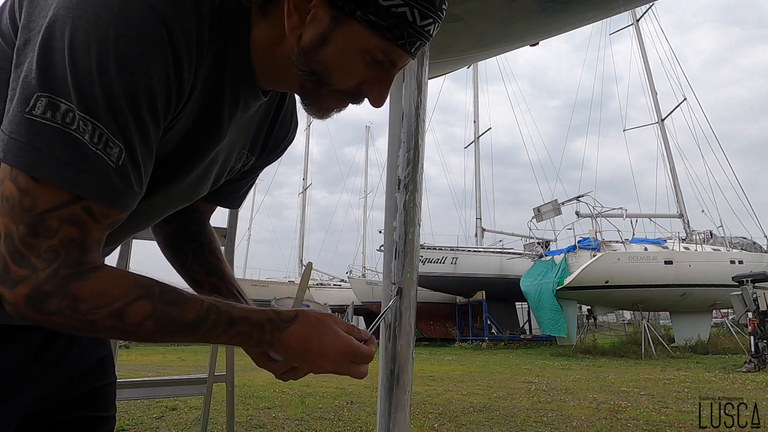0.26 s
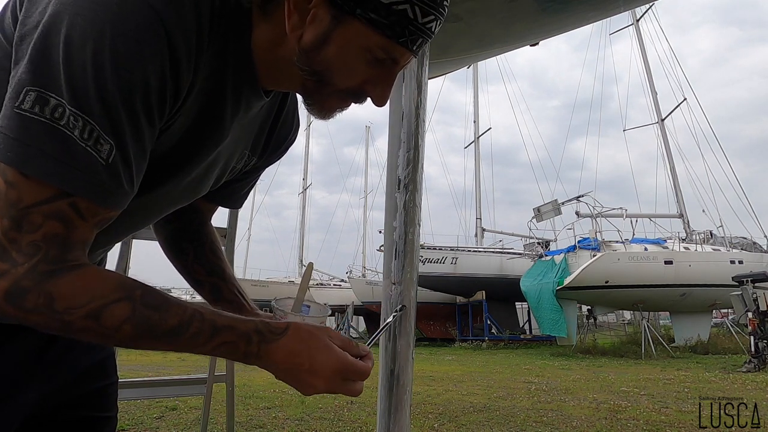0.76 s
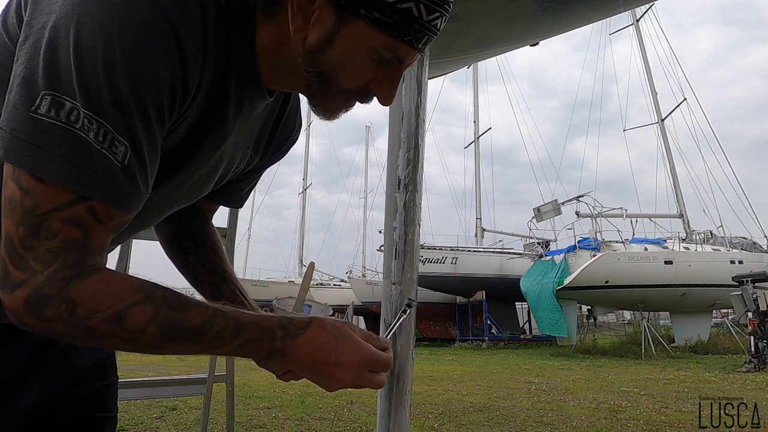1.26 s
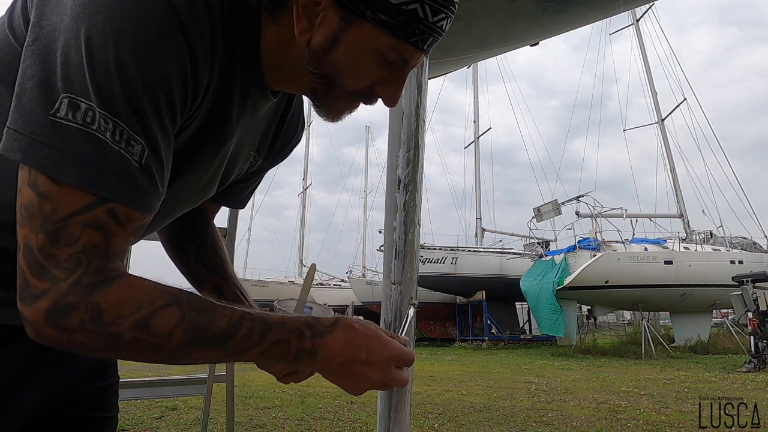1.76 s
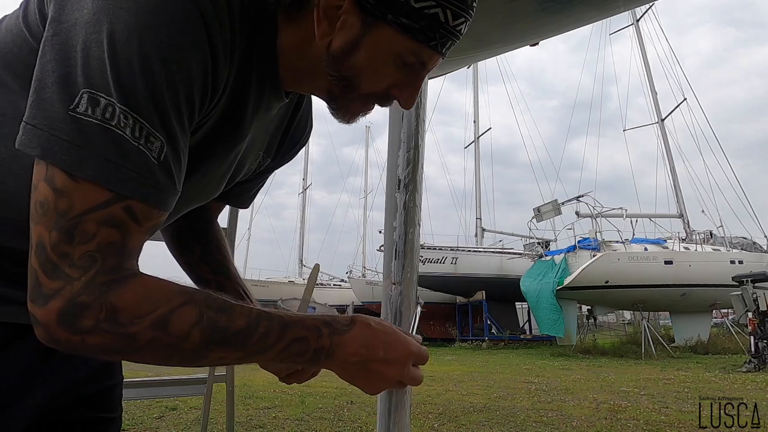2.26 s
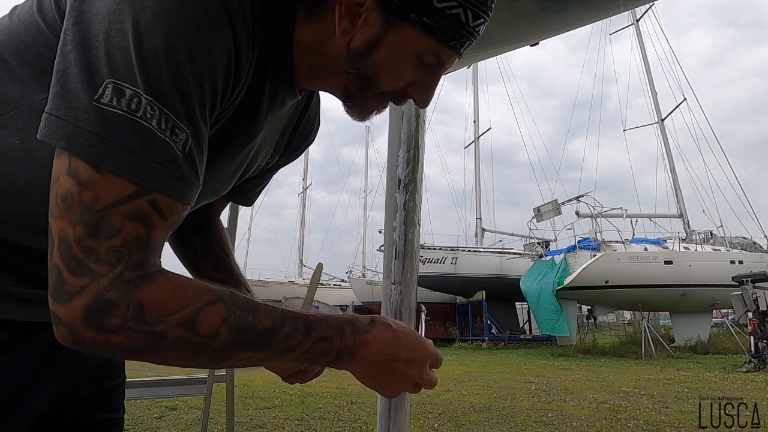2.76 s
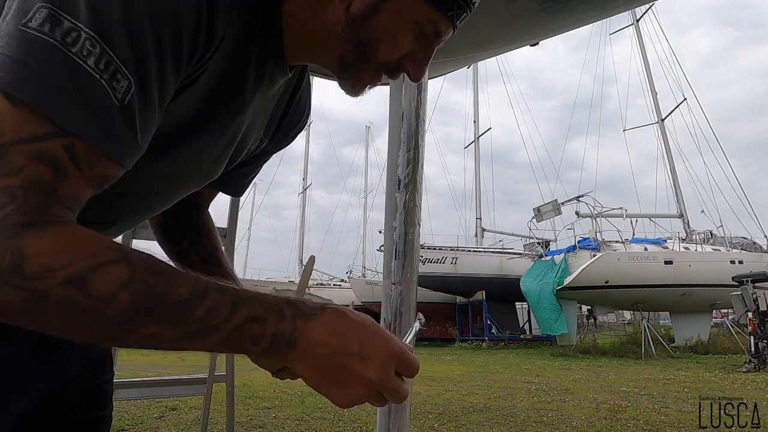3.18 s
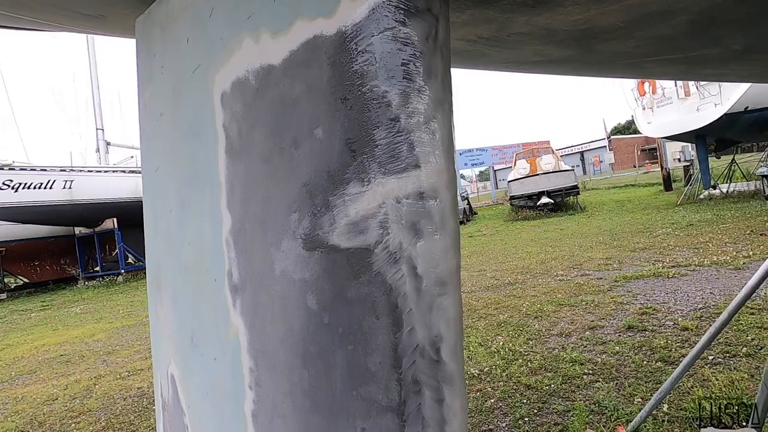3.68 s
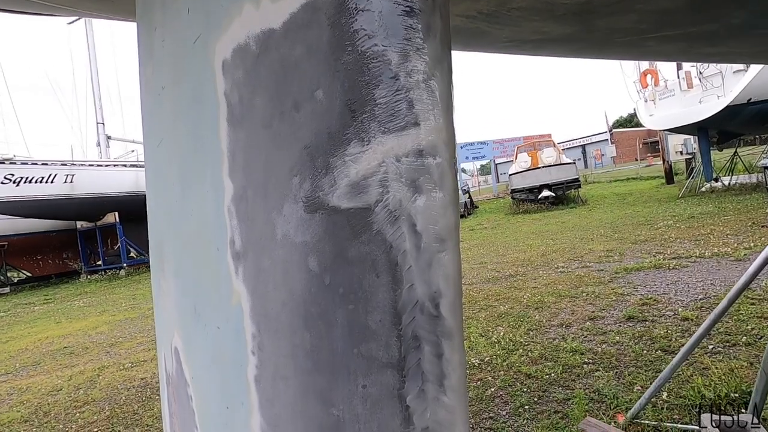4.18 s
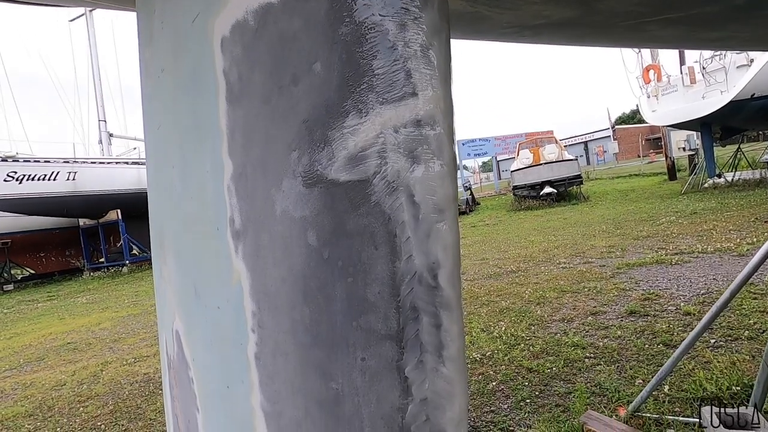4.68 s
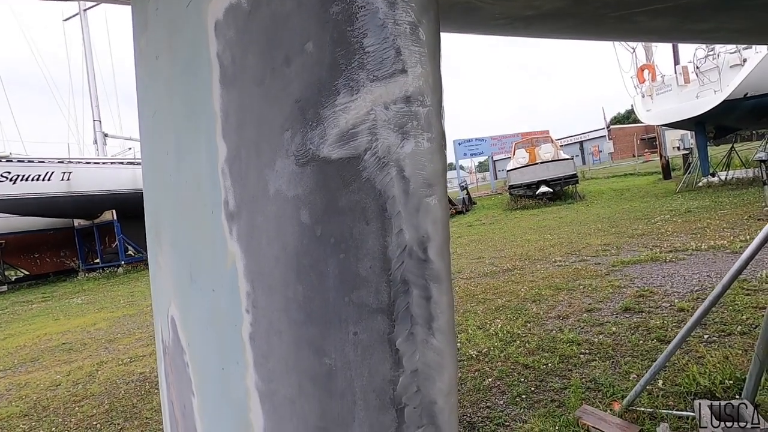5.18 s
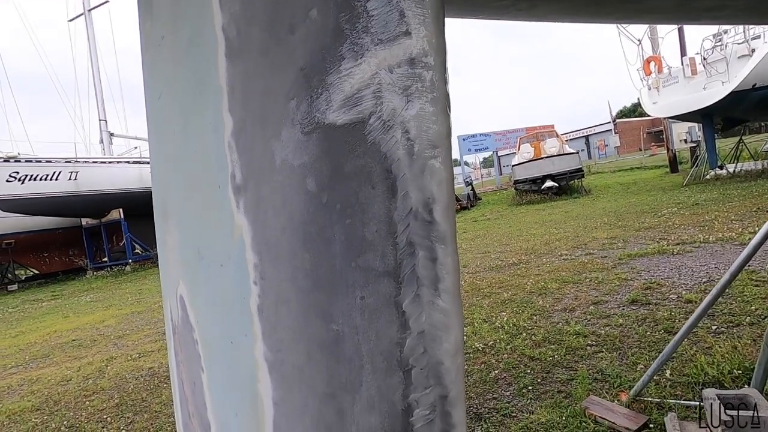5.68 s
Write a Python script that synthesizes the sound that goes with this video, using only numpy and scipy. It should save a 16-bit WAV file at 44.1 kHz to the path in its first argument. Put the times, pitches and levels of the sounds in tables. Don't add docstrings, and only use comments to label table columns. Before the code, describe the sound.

A steady low engine hum with wind rumble and small scrapes cuts off abruptly, leaving a quieter yard with metallic clacks, knocks and a loud clank.

```python
import sys
import numpy as np
from scipy import signal
from scipy.fft import rfft, irfft, next_fast_len
from scipy.io import wavfile
from scipy.ndimage import uniform_filter1d, map_coordinates

SR = 44100
rng = np.random.default_rng(int(sys.argv[2]) if len(sys.argv) > 2 else 0)


def transcribe(signal):
    frames = np.atleast_2d(signal).T
    limited = np.clip(frames, -1, 1)
    pcm = np.round(limited * 32767).astype(np.int16)
    wavfile.write(sys.argv[1], SR, pcm)


def field_ratio(decibels):
    return 10 ** (np.asarray(decibels, dtype=float) / 20)


N = 261065
CUT_S = 3.637


def unit(x):
    return x / np.sqrt(np.mean(x ** 2) + 1e-20)


def along(points, hz):
    f, v = np.transpose(points)
    return np.interp(np.log(hz + 1), np.log(f + 1), v)


def curves(rows):
    s, *cols = np.transpose(rows)
    return [np.interp(np.arange(N) / SR, s, c) for c in cols]


def by_shot(pair, drift_per_s=0):
    t = np.arange(N) / SR
    return np.where(t < CUT_S, pair[0] + drift_per_s * t, pair[1])


def bumps(rows):
    t = np.arange(N) / SR
    return sum(height * np.exp(-((t - s) / half_s) ** 2) for s, height, half_s in rows)


def wobble(rate_hz):
    knots = rng.standard_normal(int(N * 40 / SR) + 4)
    return map_coordinates(knots, [np.arange(N) * min(rate_hz, 40) / SR])


def filtered(x, response):
    m = next_fast_len(N + 8192)
    return irfft(rfft(x, m) * response(np.fft.rfftfreq(m, 1 / SR)), m)[..., :N]


def rush(spectrum, alike, patchy_db):
    z = signal.stft(rng.standard_normal((2, N)), nperseg=512)[2]
    field = uniform_filter1d(rng.standard_normal(z.shape[1:]), size=6, axis=0)
    field = uniform_filter1d(field, size=12, axis=1)
    pair = signal.istft(z * field_ratio(patchy_db * unit(field)), nperseg=512)[1][:, :N]

    def mid_side(hz):
        turn_rad = np.arccos(np.clip(along(alike, hz), -1, 1)) / 2
        return field_ratio(along(spectrum, hz)) * [np.cos(turn_rad), np.sin(turn_rad)]

    mid, side = filtered(pair, mid_side)
    return unit(np.array([mid + side, mid - side]))


def machinery():
    # (frequency [Hz], width [Hz], first shot level [dB], second shot level [dB])
    motors = [(65.7, 4.8, -36, -47.5), (107, 5.5, -45, -42.5), (134.4, 12, -54.5, -45),
              (165.6, 6.1, -48, -49), (229.5, 9, -51, -54), (348.7, 14, -61, -75), (511, 25, -56.5, -73),
              (548, 35, -60, -112)]
    t = np.arange(N) / SR
    out = np.zeros(N)
    for hz, width_hz, first_db, second_db in motors:
        phase = 2 * np.pi * hz * t
        line = wobble(width_hz) * np.sin(phase) + wobble(width_hz) * np.cos(phase)
        out += field_ratio(by_shot((first_db, second_db))) * line
    return out


def air():
    # (time [s], level over calm [dB], half length [s])
    gusts = [(.235, 16, 0.087), (.47, 9, 0.071), (.74, 6.5, 0.084), (1.53, 18.5, 0.082), (2.1, 4, 0.098),
             (3.71, 9.5, 0.013), (4.15, 6.5, 0.021), (4.4, 5.5, 0.027), (4.75, 7, 0.13), (5.32, 8.5, 0.03),
             (5.45, 10.5, 0.024), (5.7, 1, 0.2)]
    # (frequency [Hz], density [dB per Hz])
    rumble_colour = [(12, -120), (20, -10), (35, 10), (70, 0.5), (110, 2.5), (140, 1.5), (200, -9),
                     (300, -23.5), (500, -120)]
    # (frequency [Hz], density [dB per Hz])
    buffet_colour = [(10, -120), (18, -13), (40, 5.5), (80, -11), (160, -22), (350, -27), (600, -120)]
    gust_db = bumps(gusts)
    rumble_db = by_shot((-34.5, -36.5)) + by_shot((0.12, 0.93)) * gust_db
    buffet_db = by_shot((-32.5, -44)) + by_shot((.55, .6)) * gust_db
    rumble = field_ratio(rumble_db + 0.73 * wobble(5.8)) * rush(rumble_colour, [(60, 1.0)], patchy_db=3.0)
    lumps = field_ratio(1.4 * np.array([wobble(8.6), wobble(7.4)]))
    buffet = unit(lumps * rush(buffet_colour, [(60, 0.2)], patchy_db=.5))
    return rumble + field_ratio(buffet_db) * buffet


def yard():
    # (frequency [Hz], left-right likeness [0..1])
    likeness = [(60, 0.76), (300, 1), (1000, 0.92), (3000, 0.45), (5000, 0.034)]
    # (frequency [Hz], density [dB per Hz])
    drone_colour = [(100, -25.5), (170, -2.5), (223, -8), (291, -15.5), (361, -15.5), (410, -22),
                    (464, -19), (549, -31.5), (800, -28), (1040, -58.5), (1760, -120)]
    # (frequency [Hz], density [dB per Hz])
    road_colour = [(350, -32), (600, -1), (725, -3.5), (1000, 2), (1100, 2.5), (1350, 3.5), (1490, 2),
                   (3000, -11.5), (3900, -30.5), (6600, -120)]
    # (frequency [Hz], density [dB per Hz])
    hiss_colour = [(1300, -33.5), (2200, -19), (3300, -4), (4570, -7), (6870, -9.5), (7700, -11),
                   (8300, -36.5), (9200, -60.5), (16000, -87)]
    # (frequency [Hz], density [dB per Hz])
    rustle_colour = [(6000, -62.5), (8000, -4.5), (9500, -6), (12000, -20), (14500, -21), (16000, -38)]
    # (frequency [Hz], density [dB per Hz])
    sheen_colour = [(8500, -42.5), (10500, -5.5), (12500, -1.5), (14500, -2), (16000, -19.5)]
    # (time [s], level [dB])
    bustle = [(0, -85.5), (2.26, -88.5), (3.0, -84.5), (3.3, -77.5), (4.0, -77.5), (4.7, -79), (5.46, -80),
              (5.92, -72.5)]
    return_s, return_db_per_s = 5.65, 16.5
    swell_db = return_db_per_s * np.clip(np.arange(N) / SR - return_s, 0, None)
    drone_db = by_shot((-42.5, -48), drift_per_s=-0.26) + swell_db + 0.85 * wobble(5.1)
    road_db = by_shot((-49, -56), drift_per_s=-1.62) + swell_db + 0.17 * wobble(2.5)
    hiss_db = by_shot((-63, -66.5), drift_per_s=-1.2) + swell_db + 0.42 * wobble(26.0)
    bustle_db = curves(bustle)[0]
    fitful_db = by_shot((8, 3.5))
    rustle_db = bustle_db + fitful_db * np.clip(wobble(21), -2, .5)
    sheen_db = bustle_db + by_shot((-15.5, -6)) + fitful_db * np.clip(wobble(17), -2, .5)
    drone = field_ratio(drone_db) * rush(drone_colour, likeness, patchy_db=0.5)
    road = field_ratio(road_db) * rush(road_colour, likeness, patchy_db=0.98)
    rustle = field_ratio(rustle_db) * rush(rustle_colour, likeness, patchy_db=3.0)
    sheen = field_ratio(sheen_db) * rush(sheen_colour, likeness, patchy_db=-0.5)
    hiss = field_ratio(hiss_db) * rush(hiss_colour, likeness, patchy_db=2.0)
    return drone + road + rustle + sheen + hiss


def engine():
    # (multiple of half the firing rate, level [dB], drift as it draws off [dB per s])
    halves = [(1, -7, -3), (2, 3.5, -3), (3, -16, 1), (4, -17, 0), (6, -32, 1.5), (9, -36.5, -2),
              (12, -37, -2.5)]
    # (time [s], level [dB], half length [s])
    stumbles = [(.05, -4, 0.2), (.2, 0, 0.0087), (0.641, -7.5, 0.033), (1.31, -3.5, 0.018),
                (1.478, -21, 0.012), (1.9, -1.5, 0.24), (2.44, -5, 0.039), (3.405, -8, 0.034),
                (3.55, 2, 0.034)]
    idle_hz, loaded_hz, load_s, settle_s = 82.75, 80.46, 1.475, 0.029
    t = np.arange(N) / SR
    firing_hz = idle_hz + (loaded_hz - idle_hz) * (1 + np.tanh((t - load_s) / settle_s)) / 2
    half_phase = np.pi * np.cumsum(firing_hz) / SR + 0.023 * wobble(7.2)
    draw_off_s = np.clip(t - 1, 0, None)
    lines = np.zeros(N)
    for k, db, drift_db_per_s in halves:
        flicker_db = (0.37 + 0.21 * k) * wobble(9)
        line_db = db + drift_db_per_s * draw_off_s + flicker_db
        lines += field_ratio(line_db) * np.sin(k * (half_phase - .3))
    running = np.clip((CUT_S - t) / .01, 0, 1)
    return np.sqrt(2) * field_ratio(-24.5 + bumps(stumbles)) * lines * running


def hulls(x):
    t, out, hop = np.arange(SR // 8) / SR, np.zeros((2, N + SR)), SR // 4
    for start in range(0, N, hop):
        tail = rng.standard_normal((2, len(t))) * field_ratio(-60 * t / 0.084) * (1 - np.exp(-t / 0.0061))
        echo = signal.fftconvolve(x[None, start:start + hop], tail / np.linalg.norm(tail[0]), axes=1)
        out[:, start:start + echo.shape[1]] += echo
    return out[:, :N]


def housing(x):
    scatter_hz, scatter_db, near_left_db = 7000, 5, 2.5
    paths = rng.standard_normal(SR // 120)
    detour = signal.fftconvolve(x, paths / np.linalg.norm(paths))[:N]
    apart = filtered(detour, lambda hz: field_ratio(scatter_db) * hz ** 4 / (hz ** 4 + scatter_hz ** 4))
    return field_ratio(np.outer([.5, -.5], by_shot((near_left_db, 0)))) * np.array([x + apart, x - apart])


def ticks():
    # (time [s], peak level [dB], centre [Hz], top level [dB])
    first_ticks = [(0.2384, -63.5, 7020, -3.5), (0.2898, -56, 5970, -20), (0.3623, -51, 5140, -29),
                   (0.448, -42.5, 6620, -29.5), (0.595, -52, 5480, -41.5), (0.6993, -52, 4800, -19),
                   (0.9176, -53, 6610, -26), (1.0605, -50, 7500, -15.5), (1.478, -58.5, 5370, -13.5),
                   (1.661, -57, 7530, -26), (1.7428, -53, 6470, -24), (1.848, -61.5, 4800, -11),
                   (1.8966, -52, 6320, -40.5), (2.148, -48, 4380, -33.5), (2.173, -51.5, 6650, -34.5),
                   (2.2279, -40, 6830, -25), (2.496, -58, 6200, -16.5), (2.8096, -52, 6380, -29),
                   (2.8301, -51.5, 5090, -22.5), (2.9228, -54.5, 4980, -41), (3.03, -54, 4850, -25.5),
                   (3.5578, -43, 5630, -40.5)]
    # (time [s], peak level [dB], centre [Hz], top level
    # [dB])
    second_ticks = [(3.6339, -58.5, 4750, -15.5), (3.824, -52.5, 7220, -23), (4.019, -50, 6860, -19),
                    (4.042, -50, 5150, -20.5), (4.063, -55, 6550, -11), (4.074, -61, 4860, -6),
                    (4.196, -60.5, 7500, -7.5), (4.289, -54.5, 7500, -13.5), (4.333, -53, 5800, -18),
                    (4.4509, -53, 6990, -22.5), (4.4937, -54, 7080, -26.5), (4.5793, -52, 6800, -13.5),
                    (4.686, -55, 7030, -22), (4.7318, -50.5, 5100, -23), (4.748, -42.5, 7000, -24.5),
                    (4.858, -61, 6240, -20), (5.1838, -42.5, 5940, -15.5), (5.2402, -55.5, 4930, -12.5),
                    (5.3275, -51, 7260, -30.5), (5.3856, -57, 6570, -25), (5.489, -58, 7360, -14),
                    (5.659, -57, 7260, -17.5), (5.6832, -49.5, 4530, -20.5), (5.7975, -42.5, 4590, -25),
                    (5.874, -48.5, 6610, -17), (5.9174, -44.5, 4400, -10.5)]
    # (time [s], level [dB],
    # frequency [Hz], t60 [s])
    chirps = [(1.755, -56, 6400, .025), (2.02, -52, 6200, .07), (3.118, -45, 2750, .05),
              (3.194, -38, 3500, .04), (3.194, -41, 6700, .03), (3.264, -31, 1150, .035),
              (4.966, -46, 3100, .03), (5.742, -47, 8516, .05), (5.742, -55, 11800, .04),
              (5.742, -57, 12600, .05), (3.545, -40, 2400, .03), (3.56, -42, 3300, .025),
              (.814, -42, 560, .09), (3.247, -42, 2500, .03), (3.272, -41, 2550, .03),
              (3.29, -37, 2200, .05), (3.328, -43, 2200, .03), (4.29, -48, 7600, .02),
              (4.197, -54, 10200, .02), (5.797, -48, 7100, .02), (5.585, -55, 5800, .03),
              (.235, -62, 12400, .04), (.8, -67, 13800, .04), (3.338, -35, 950, .08),
              (3.537, -38, 2900, .03), (3.621, -30, 1250, .04), (4.243, -43, 3000, .04),
              (4.243, -50, 1300, .06), (5.719, -42, 5300, .015)]
    ring_db, body_db, sharp_db = 0.5, -7.5, 5.5
    out, t = np.zeros(N + SR), np.arange(SR // 16) / SR

    def band(size, hz):
        grain = np.convolve(rng.standard_normal(len(t)), np.hanning(size), "same")
        return unit(grain) * np.sin(2 * np.pi * hz * t)

    for s, db, hz, top_db in first_ticks + second_ticks:
        grit = band(size=30, hz=hz) + field_ratio(body_db) * band(size=30, hz=3530)
        grit += field_ratio(top_db + sharp_db) * band(size=15, hz=10100)
        out[round(s * SR):][:len(t)] += field_ratio(db + ring_db - 60 * t / 0.029) * (1 - np.exp(-t / 0.001)) * grit
    for s, db, hz, t60_s in chirps:
        ring = np.sin(2 * np.pi * hz * t) * (1 - np.exp(-t / 0.0012))
        out[round(s * SR):][:len(t)] += field_ratio(db - 60 * t / t60_s) * ring
    return out[:N]


def strike(events, modes, gain_db, crack_db, crack_t60_s, low_hz, top_hz, attack_s):
    # (frequency [Hz], level [dB])
    contact = [(300, -34), (600, 8.5), (1500, 2), (4000, -6), (7000, -8.5), (8700, -18.5), (12000, -50),
               (16000, -56)]
    rings, cracks, t = np.zeros(N + SR), np.zeros(N + SR), np.arange(SR // 4) / SR
    for s, db, *bright_db in events:
        tilt_db = sum(bright_db) / 2
        scatter = field_ratio(rng.normal(0, 1.5, len(modes)))
        rattle = unit(uniform_filter1d(rng.standard_normal(len(t)), size=150))
        flutter_rad = .45 * rattle * field_ratio(-60 * t / .15)
        ring = np.zeros(len(t))
        for g, (hz, level_db, t60_s) in zip(scatter, modes):
            mode_db = level_db + tilt_db * np.log2(hz / 3000) - 60 * t / t60_s
            ring += g * field_ratio(mode_db) * np.sin(2 * np.pi * hz * t + g * 9 + flutter_rad * hz / 3000)
        blow = field_ratio(db + gain_db) * (1 - np.exp(-t / attack_s))
        crack = field_ratio(crack_db - 60 * t / crack_t60_s) * rng.standard_normal(len(t))
        rings[round(s * SR):][:len(t)] += blow * ring
        cracks[round(s * SR):][:len(t)] += blow * crack

    def colour(hz):
        highpass = hz ** 4 / (hz ** 4 + low_hz ** 4)
        return field_ratio(along(contact, hz)) * highpass / (1 + (hz / top_hz) ** 8)

    return rings[:N] + filtered(cracks[:N], colour)


def tap():
    # (time [s], peak level [dB])
    blows = [
        (.796, -25.5),
        (.815, -38),
    ]
    # (frequency [Hz], level [dB], t60 [s])
    modes = [(544, -7, 0.14), (630, -23, 0.36), (1540, -10.5, 0.05), (2716, 0, 0.12), (3270, -13.5, 0.088),
             (3930, -15.5, 0.029), (4800, -17.5, 0.024), (6620, 2.5, 0.028), (8700, -34, 0.023)]
    return strike(blows, modes, gain_db=-5.5, crack_db=-2.5, crack_t60_s=0.11,
                  low_hz=650, top_hz=7000, attack_s=0.0014)


def clack():
    # (time [s], peak level [dB], brightness [dB])
    blows = [
        (4.1087, -19.5, -1),
        (4.1135, -31.5, -1),
    ]
    # (frequency [Hz], level [dB], t60 [s])
    modes = [(636, -9, 0.032), (1050, -7.5, 0.053), (1465, 6, 0.035), (2310, -2, 0.08), (2780, -15, 0.14),
             (3050, -12, 0.075), (3420, -9, 0.31), (4110, -3, 0.029), (6400, 6, .03), (7250, -8, 0.027),
             (9200, -18, .02)]
    return strike(blows, modes, gain_db=-15.0, crack_db=3.0, crack_t60_s=0.14,
                  low_hz=785, top_hz=15000, attack_s=0.0005)


def knock():
    # (time [s], peak level [dB], brightness [dB])
    blows = [
        (4.9052, -27, -2),
        (4.9135, -32, -8),
        (4.9655, -40.5, 1),
    ]
    # (frequency [Hz], level [dB], t60 [s])
    modes = [(1448, -0.5, 0.047), (2290, -6.5, 0.1), (2760, -13, 0.092), (3050, -9.5, .04),
             (3402, -13, 0.14), (3854, -16, .08), (4080, -9.5, 0.053), (4200, -10.5, 0.037),
             (5240, -13, .03), (6315, -17, .05), (6800, -2, .03), (7540, -16, .03)]
    return strike(blows, modes, gain_db=-9, crack_db=4, crack_t60_s=0.047,
                  low_hz=900, top_hz=10500, attack_s=0.00088)


def clink():
    # (time [s], peak level [dB], brightness [dB])
    blows = [
        (4.2424, -33.5, -13.5),
        (5.0389, -27.5, -8.5),
    ]
    # (frequency [Hz], level [dB], t60 [s])
    modes = [(1265, -5, .06), (1986, 0, .11), (2638, -6, .1), (3058, -8, .12), (3208, -10, .08),
             (3930, -6, .08), (4167, -7, .08), (4452, -8, .08), (4759, -5, .08), (5459, -1, .07),
             (6627, -11, .07), (7531, -10, .05)]
    return strike(blows, modes, gain_db=-10.0, crack_db=5.3, crack_t60_s=0.14,
                  low_hz=1400, top_hz=12200, attack_s=.0008)


def clank():
    # (time [s], peak level [dB])
    blows = [
        (5.7393, -7.5),
        (5.7468, -15.5),
    ]
    # (frequency [Hz], level [dB], t60 [s])
    modes = [(1297, -17, .1), (1986, -4, .12), (2308, -4, .12), (2640, -4, .13), (2988, -5, .13),
             (3052, -5, .15), (3411, -8, .13), (3620, -8, .09), (3896, -4, .09), (4163, -3, .1),
             (4441, -7, .11), (4759, -4, .1), (5200, -12, .07), (6700, -14, .08)]
    return strike(blows, modes, gain_db=-15.5, crack_db=6.5, crack_t60_s=0.082,
                  low_hz=1410, top_hz=14000, attack_s=0.0019)


def scrapes():
    # (time [s], hold [s], rasp level [dB], hull level [dB], edge level [dB])
    strokes = [(3.191, 0.01, -50, -13.5, -7), (3.202, 0.05, -55, -8.5, -3.5),
               (3.246, 0.01, -47.5, -7.5, -17.5), (3.264, .006, -43, -1, -17.5),
               (3.267, 0.064, -50, 1, -12), (3.284, 0.0044, -49, -13.5, -19.5),
               (3.336, 0.027, -53, 10.5, -12.5), (3.358, 0.011, -62.5, -3, -1), (3.362, 0.12, -62.5, 3, -6),
               (3.484, 0.022, -60.5, 0.5, -14), (3.508, 0.025, -50, -17, -21),
               (3.532, 0.019, -41.5, -2, -16), (3.552, 0.043, -49.5, 0.5, -21.5),
               (3.593, 0.023, -50, -9, -14), (3.62, 0.0037, -49, 15.5, -10), (3.78, .002, -59.5, -18, 10),
               (3.7975, 0.0023, -50, -18, 5.5), (3.804, 0.016, -64.5, -13.5, 4),
               (4.266, 0.0026, -51, -2, -0.5), (4.276, 0.0027, -57, -8, -4), (5.009, .01, -70.5, -10, 3),
               (5.074, 0.012, -57, -10, -13), (5.121, .004, -66, -10, 0), (4.178, 0.0034, -72, -10, 0),
               (4.732, 0.01, -72, -16, 13), (4.772, .004, -74, -10, -10), (5.722, 0.018, -54.5, -11, -7)]
    # (frequency [Hz], density [dB per Hz])
    rasp_colour = [(700, -18.5), (1500, -4), (2400, -1), (3300, -2), (4500, -4.5), (6000, -13),
                   (9000, -37.5)]
    # (frequency [Hz], density [dB per Hz])
    edge_colour = [(4000, -30), (5500, -2), (7200, 0), (7900, -6), (8500, -22), (11000, -32), (15500, -52)]
    # (frequency [Hz], width [Hz], level [dB])
    resonances = [(894, 720, 11), (1187, 800, 5.5)]
    bite_s, slip_t60_s = 0.0008, 0.024
    clumps = uniform_filter1d(rng.standard_normal((3, N)), size=200)
    clumps = unit(uniform_filter1d(clumps, size=200))
    grains = rng.standard_normal((3, N)) * field_ratio(2 * rng.exponential(size=(3, N)) + 3 * clumps)

    def ring(f):
        return sum(field_ratio(db) * 1j * f * w / (c * c - f * f + 1j * f * w) for c, w, db in resonances)

    def colours(hz):
        return np.array([field_ratio(along(rasp_colour, hz)), ring(hz) ** 2, field_ratio(along(edge_colour, hz))])

    rasp, hull, edge = map(unit, filtered(grains, colours))
    out, t = np.zeros(N), np.arange(SR // 5 - 200) / SR
    for s, hold_s, db, hull_db, edge_db in strokes:
        span = slice(round(s * SR), round(s * SR) + len(t))
        push = (1 - np.exp(-t / bite_s)) * field_ratio(db - 60 * np.clip(t - hold_s, 0, None) / slip_t60_s)
        out[span] += push * (rasp[span] + field_ratio(hull_db) * hull[span] + field_ratio(edge_db) * edge[span])
    return out


def scene():
    near = tap() + clack() + knock() + clink() + clank() + ticks() + scrapes()
    first = np.arange(N) < CUT_S * SR
    echoes = first * hulls(first * near) + hulls(~first * near)
    return engine() + machinery() + air() + yard() + housing(near) + field_ratio(-14) * echoes


def gate(x):
    # (frequency [Hz], share of time open [0..1])
    open_first = [(7900, 1), (8600, .8), (10000, .55), (12500, .42), (14000, .25), (15500, .08)]
    # (frequency [Hz], share of time open [0..1])
    open_second = [(7900, 1), (9000, .97), (11000, .9), (13500, .85), (14600, .55), (15600, .2)]
    scrape_s = 3.191
    hz, t, z = signal.stft(x, SR, nperseg=1024)
    power = uniform_filter1d(np.sum(abs(z) ** 2, 0), size=14, axis=0)
    passes = np.ones(power.shape, bool)
    for part, share in ((t < scrape_s, open_first), (t >= scrape_s, open_second)):
        rank = power[:, part].argsort(1).argsort(1) / part.sum()
        passes[:, part] = rank >= 1 - along(share, hz)[:, None]
    return signal.istft(z * passes, SR, nperseg=1024)[1][:, :N]


def top_cut(x):
    return signal.sosfilt(signal.butter(12, 15750, fs=SR, output="sos"), x)


def record(dry):
    # (frequency [Hz], left over right [dB])
    left_over = [(30, 7), (120, 6.3), (180, 3.5), (310, 2), (920, 1.2), (1600, 2), (2760, 4.5), (4770, 5.5),
                 (8250, 6.5)]
    # (frequency [Hz], left lead [rad])
    left_lead = [(40, -.15), (100, -.08), (130, -.1), (170, -.6), (520, -1), (3450, -1), (5500, -.2),
                 (9000, .8)]
    # (time [s], level [dB])
    bass_side = [(4.75, -11), (5.05, -8), (5.3, 1.5), (5.92, -5)]
    reopen_s, rise_s = 4.6, .15
    treble_side_db, treble_db_per_s = -16, 2.5

    def tilt(hz):
        halves = [.5, -.5]
        return field_ratio(np.outer(halves, along(left_over, hz))) * np.exp(1j * np.outer(halves, along(left_lead, hz)))

    left, right = filtered(dry, tilt)
    mid, side = (left + right) / 2, (left - right) / 2
    bass = filtered(side, lambda hz: 1 / (1 + (hz / 250) ** 4))
    since_s = np.arange(N) / SR - reopen_s
    shut_db = -30 * np.clip(1 - since_s / rise_s, 0, 1)
    second = since_s > CUT_S - reopen_s
    bass_db = second * (curves(bass_side)[0] + shut_db)
    treble_db = second * (treble_side_db + treble_db_per_s * since_s + shut_db)
    side = field_ratio(bass_db) * bass + field_ratio(treble_db) * (side - bass)
    mix = gate(np.array([mid + side, mid - side]))
    return top_cut(mix)


dry = scene()
out = record(dry)
transcribe(out)
```